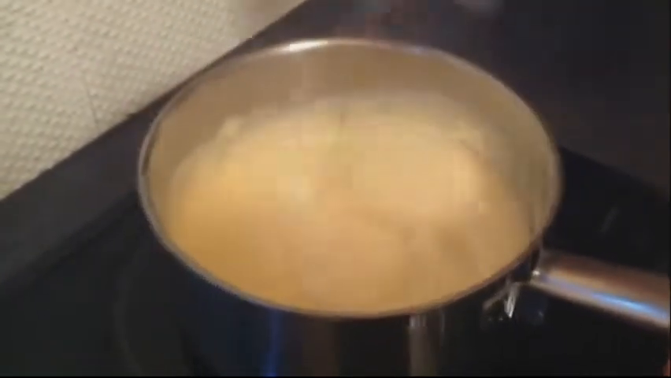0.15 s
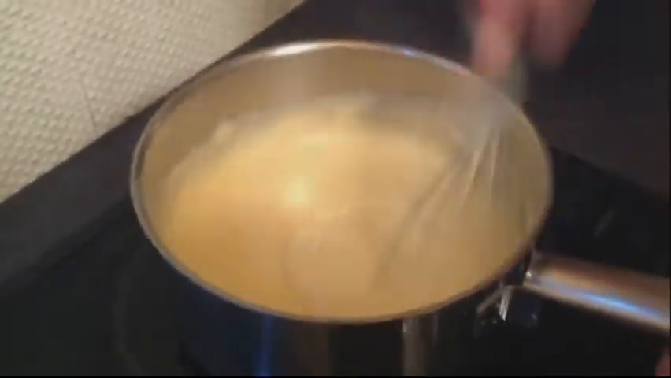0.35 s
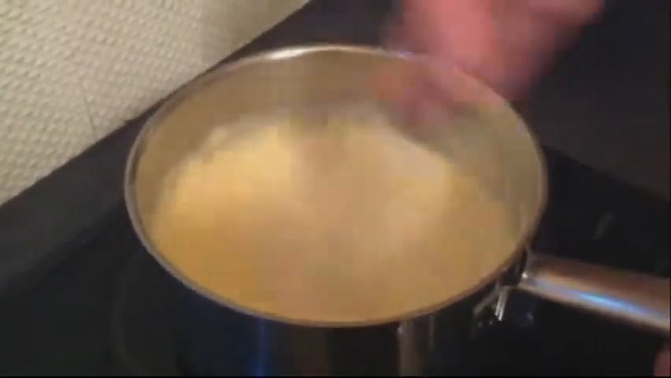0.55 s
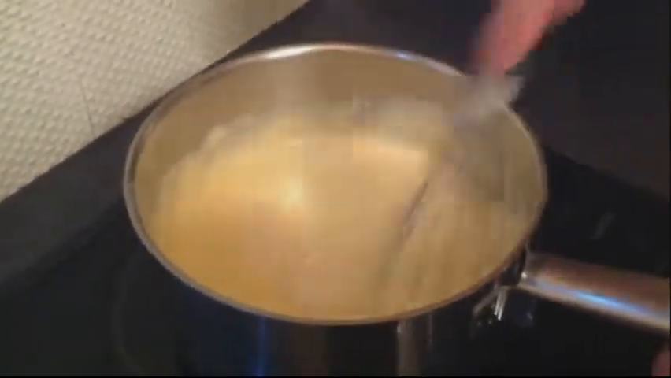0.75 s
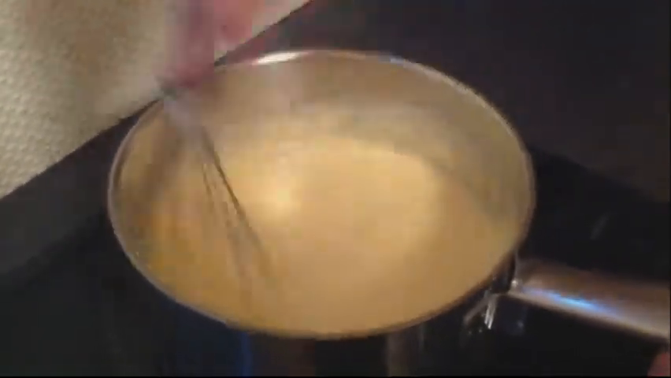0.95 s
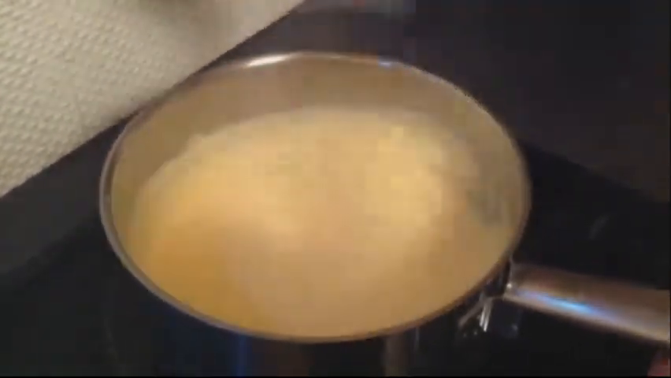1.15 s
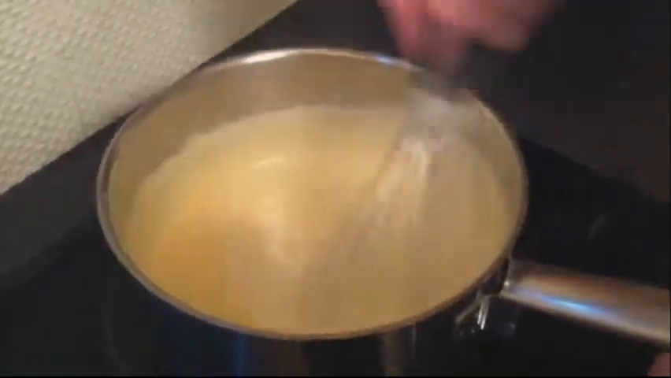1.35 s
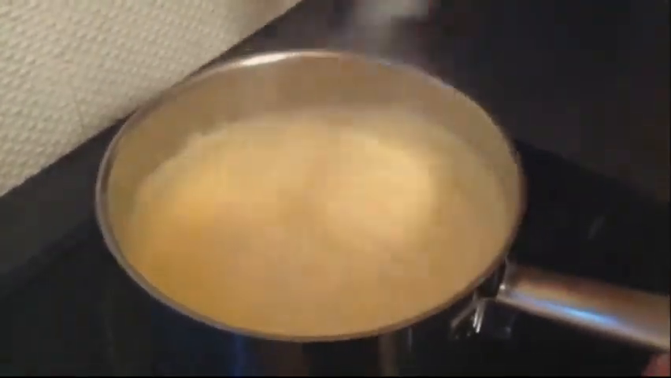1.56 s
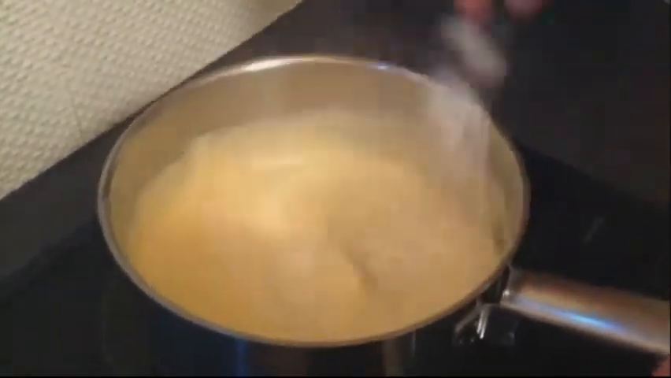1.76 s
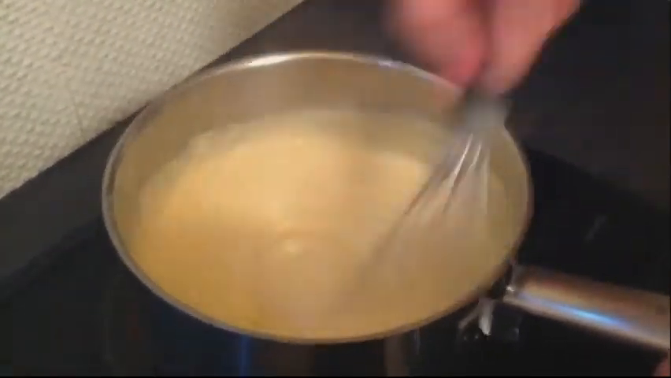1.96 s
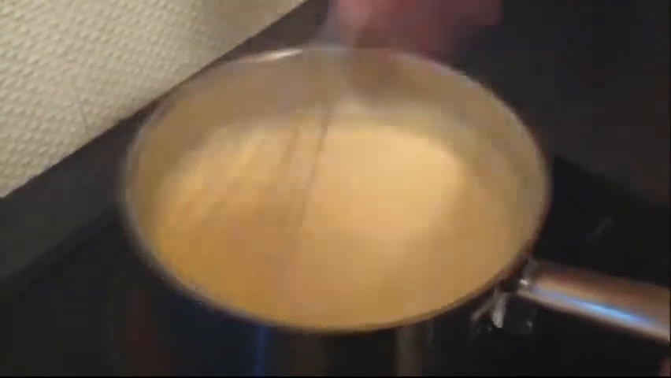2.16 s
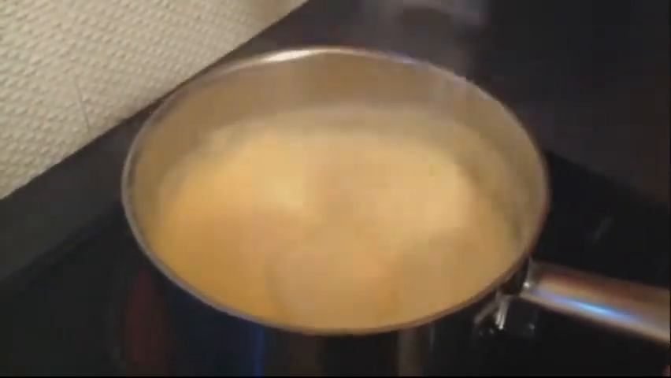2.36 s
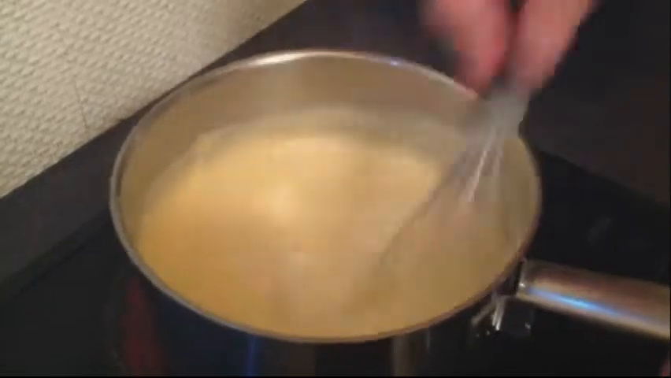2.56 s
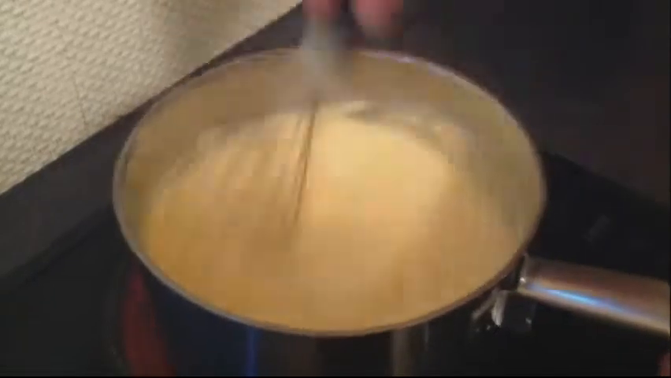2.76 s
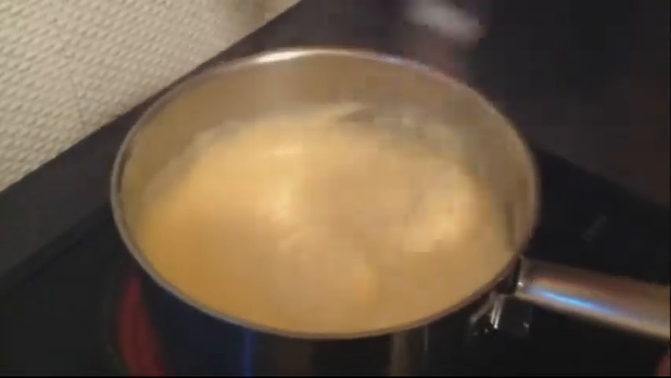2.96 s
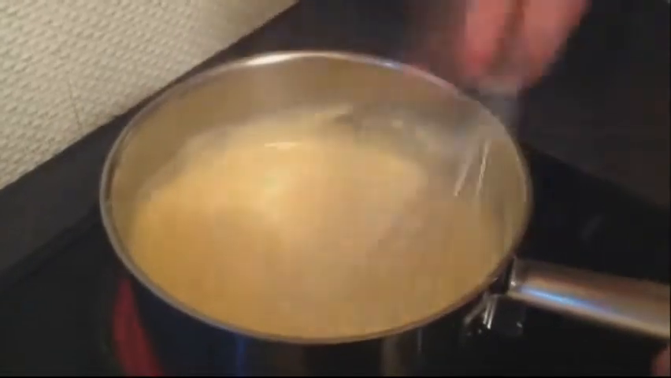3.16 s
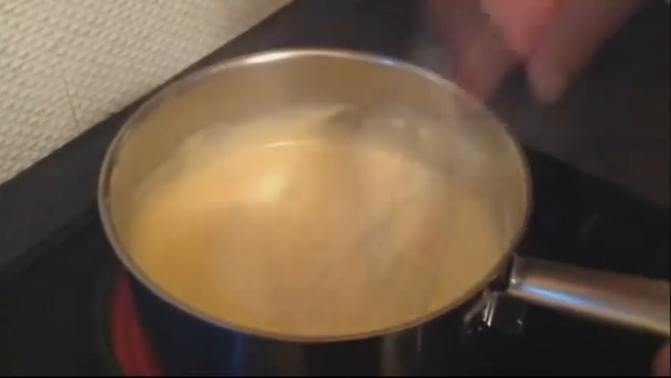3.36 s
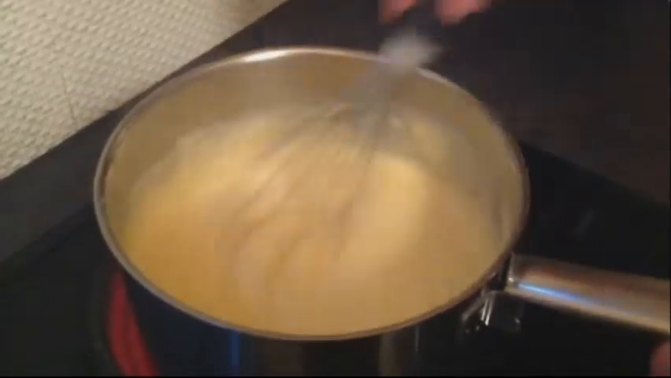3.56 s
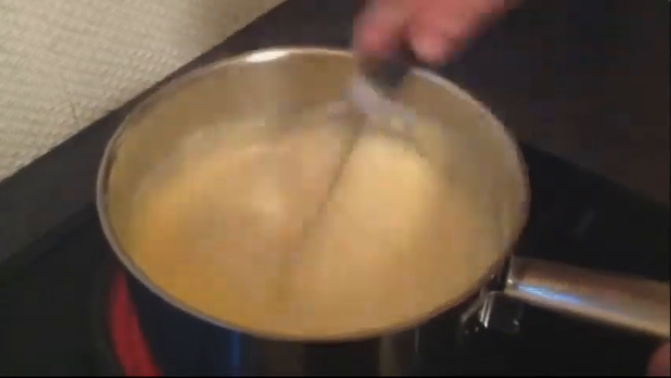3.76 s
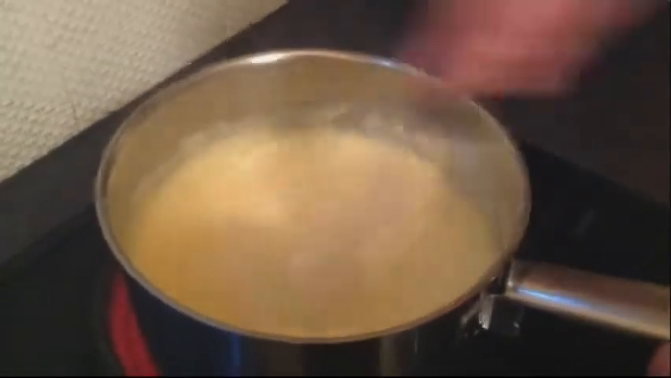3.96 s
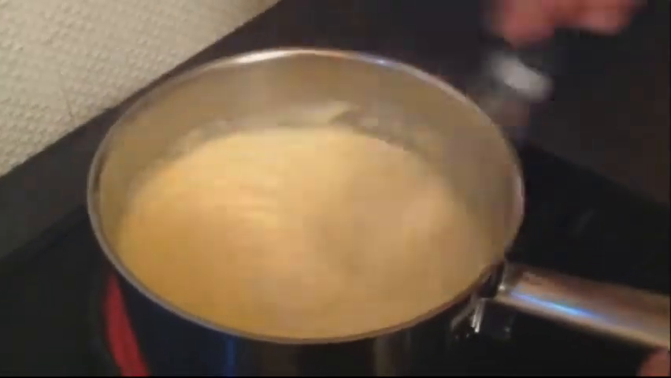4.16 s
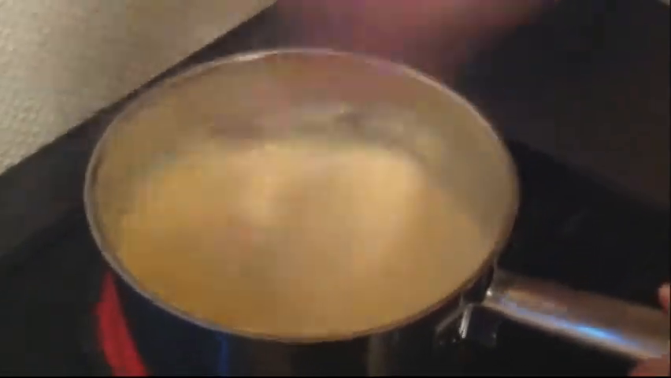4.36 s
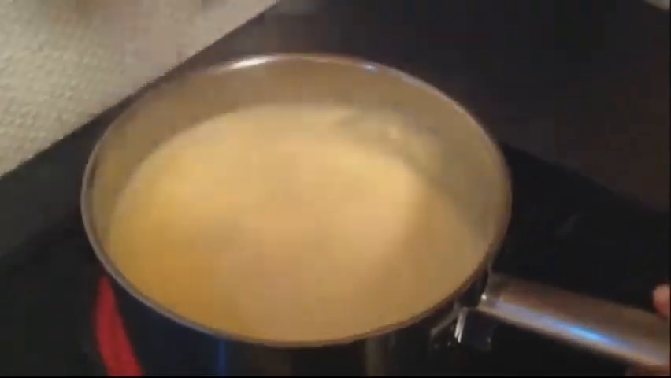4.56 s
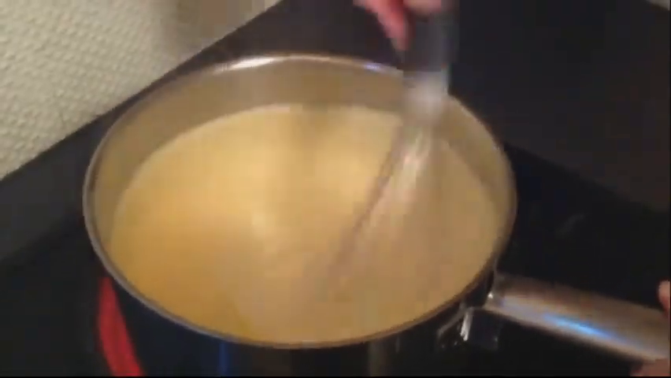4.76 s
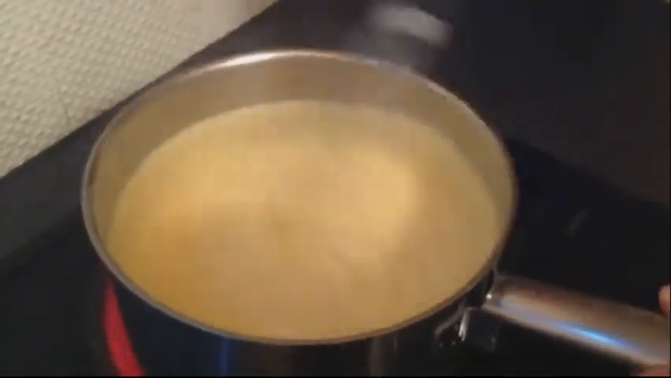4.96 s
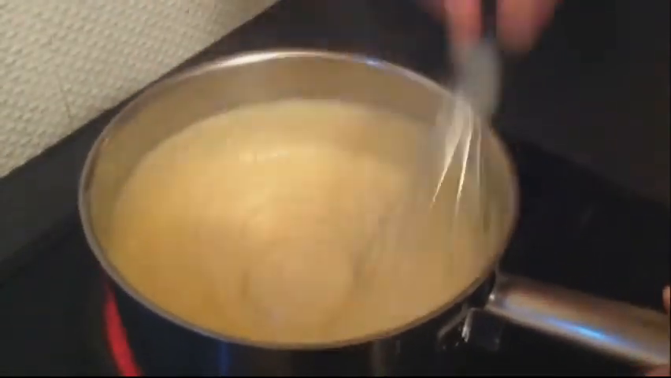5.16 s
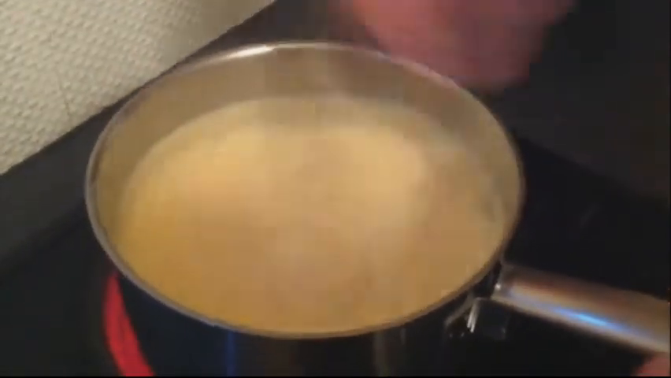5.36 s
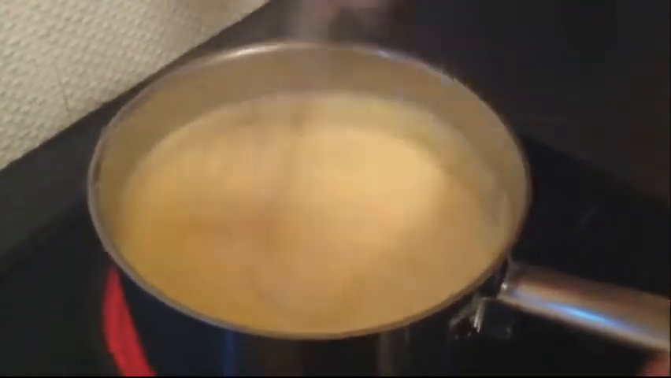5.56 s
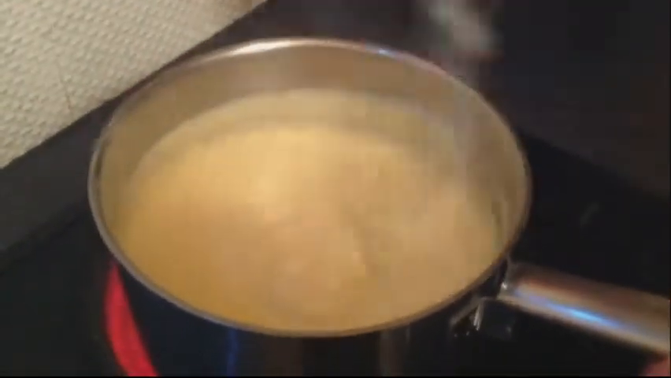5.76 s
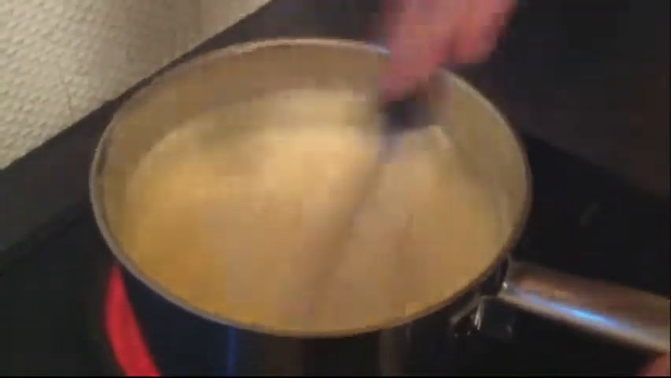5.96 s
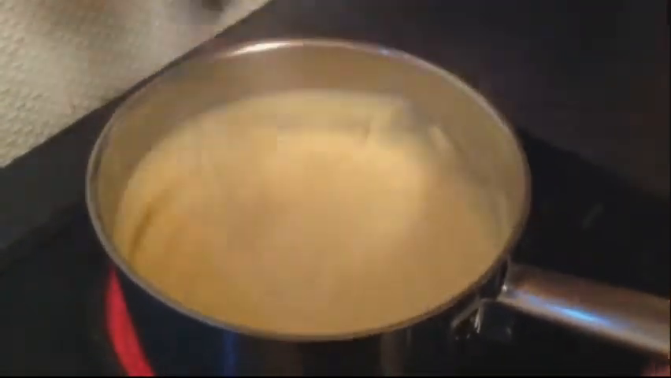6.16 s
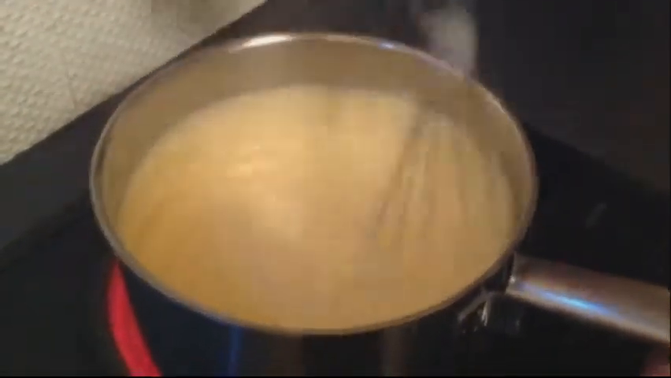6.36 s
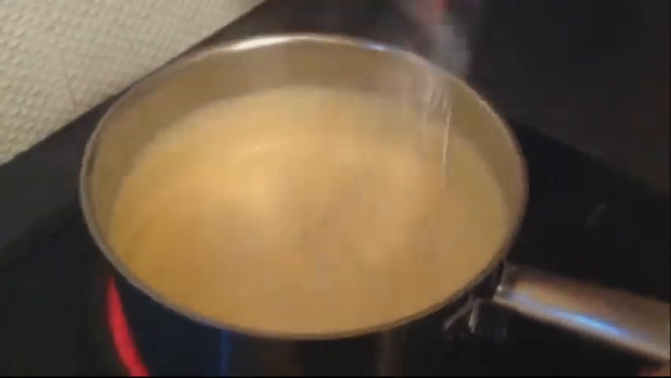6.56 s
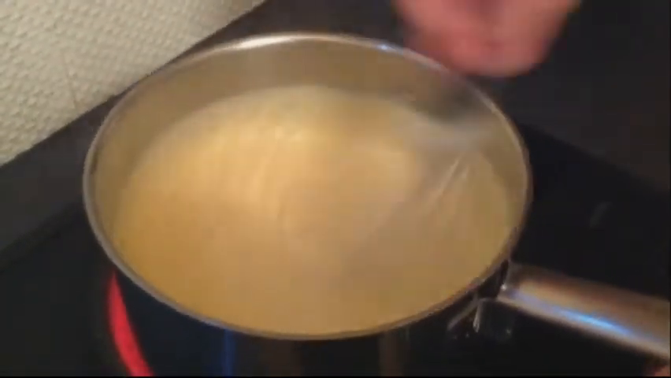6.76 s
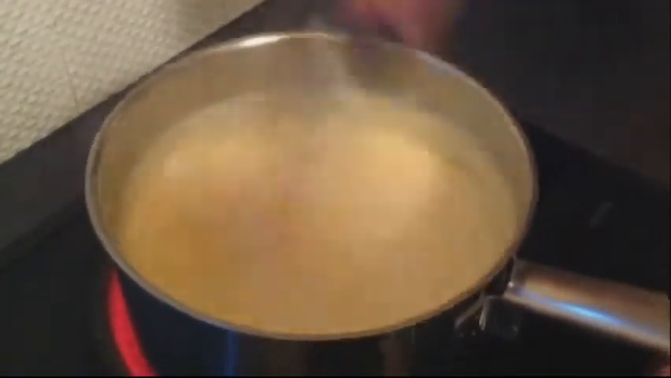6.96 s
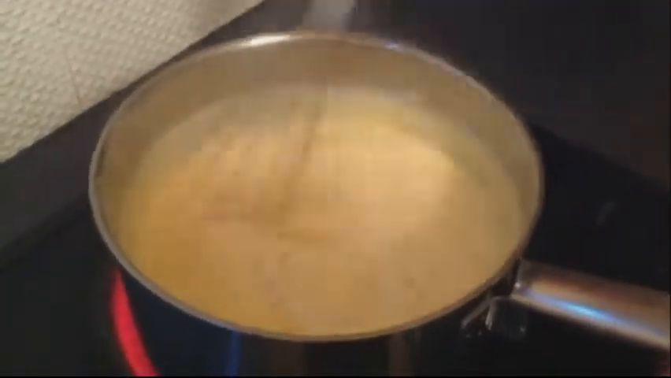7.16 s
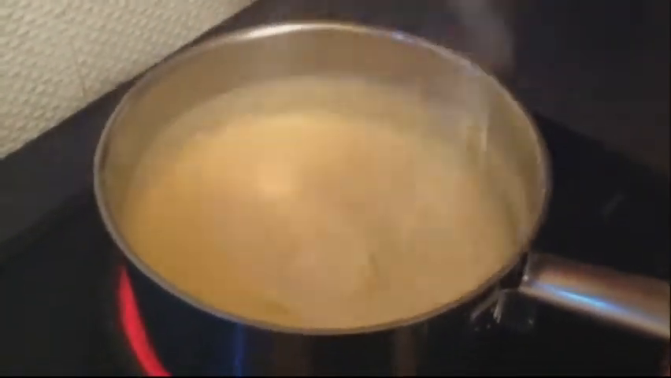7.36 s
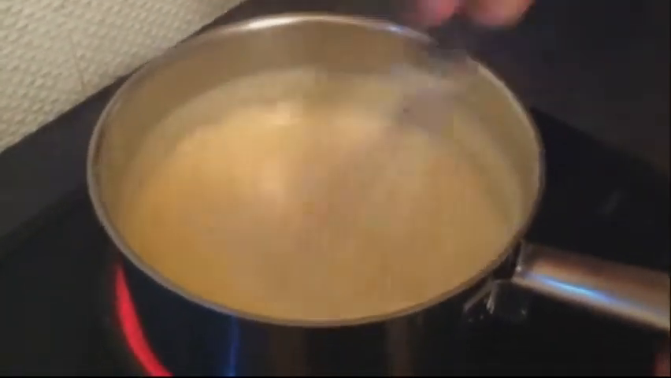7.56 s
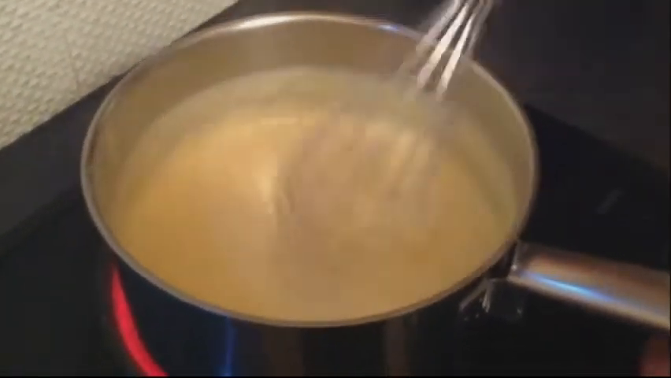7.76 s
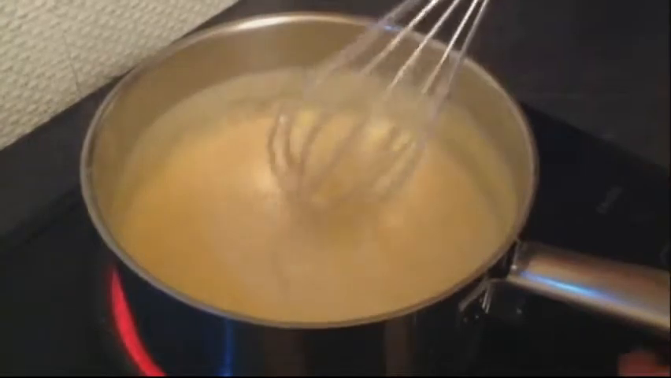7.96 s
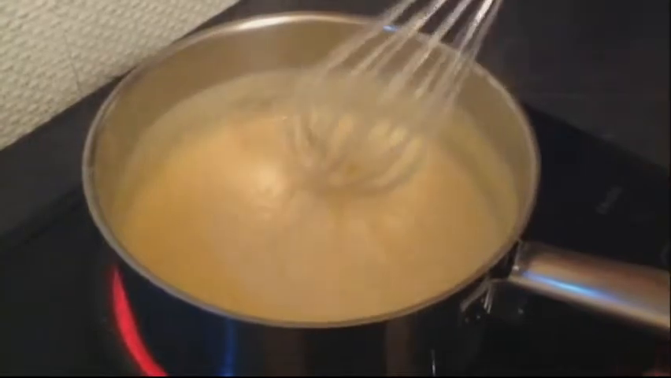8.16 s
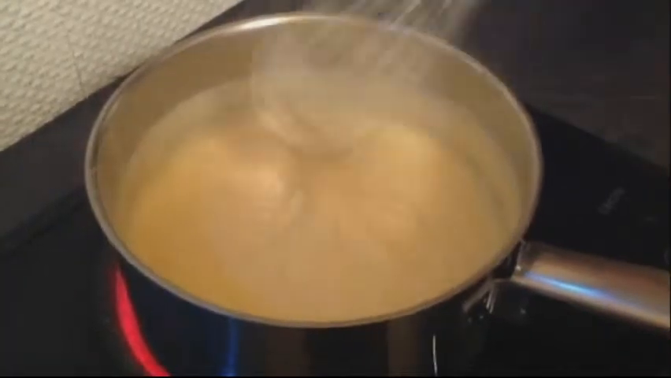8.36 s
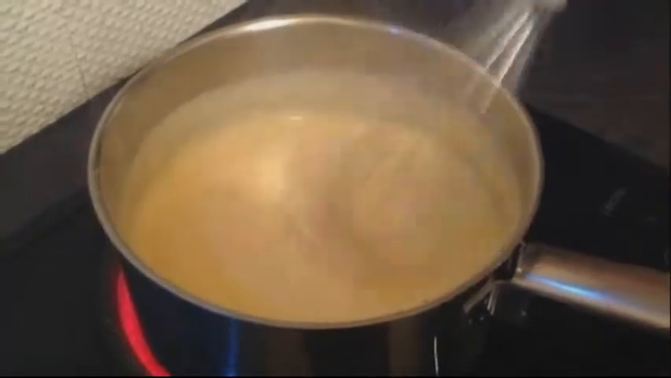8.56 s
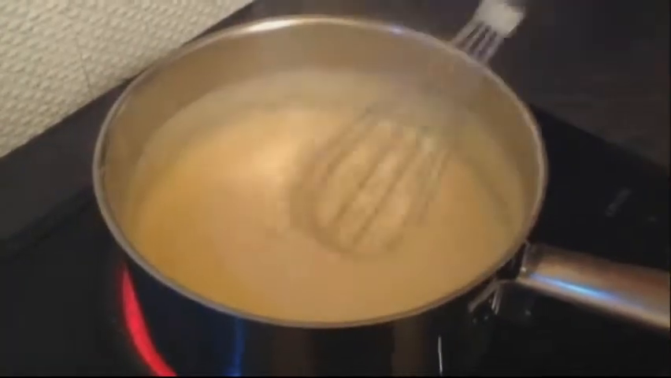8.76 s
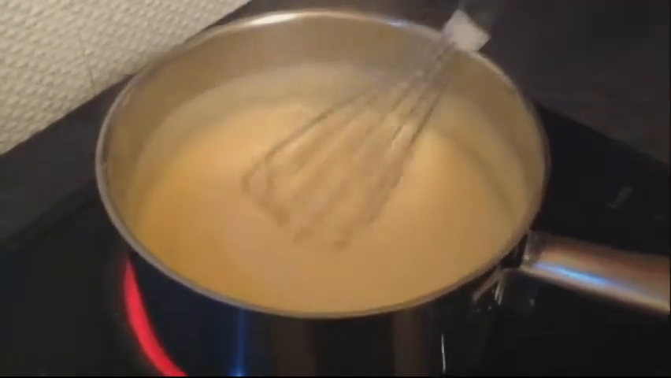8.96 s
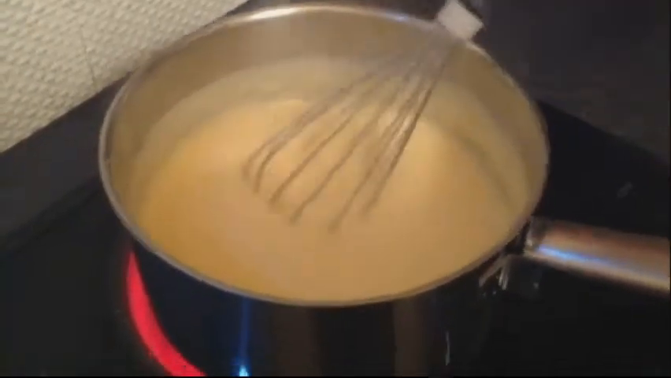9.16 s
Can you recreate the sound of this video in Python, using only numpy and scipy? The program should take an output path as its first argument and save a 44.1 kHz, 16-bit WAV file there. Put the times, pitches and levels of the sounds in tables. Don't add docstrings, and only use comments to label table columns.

```python
import sys
import numpy as np
from scipy import signal
from scipy.fft import rfft, irfft, next_fast_len
from scipy.io import wavfile
from scipy.ndimage import uniform_filter1d, map_coordinates

SR = 44100
rng = np.random.default_rng(int(sys.argv[2]) if len(sys.argv) > 2 else 0)


def volts_from_decibels(level):
    exponent = np.asarray(level, float) / 20
    return 10 ** exponent


def wav_out(sig):
    wavfile.write(sys.argv[1], SR, np.round(np.clip(np.atleast_2d(sig).T, -1, 1) * 32767).astype(np.int16))


N = 406594

# (frequency [Hz], width [Hz], level [dB])
WIRE_MODES = [(2732, 500, -9.5), (3262, 407, -4.5), (3893, 398, -0.5), (4314, 840, 1), (5066, 1380, -0.5),
              (6060, 1055, 1), (6947, 1610, -1), (8153, 1090, -1)]
# (frequency [Hz], width [Hz], level [dB])
TIP_MODES = [(9020, 650, 2.5), (9780, 2820, -3.5), (11170, 505, -2.5), (11610, 566, -4.5),
             (13370, 2700, -1), (14550, 2000, -3.5)]
# (frequency [Hz], width [Hz], level [dB])
LOOP_MODES = [(2090, 55, -7.5), (2810, 76, -6.5), (3252, 140, 3), (3853, 120, 0.5), (4284, 120, -2.5),
              (4507, 86, 3.5), (4920, 43, -4), (5274, 150, 4.5), (5560, 49, -5), (6560, 110, 3.5),
              (7430, 150, -4.5), (7880, 133, 1), (8320, 150, 5.5), (9770, 117, -10.5)]
# (frequency [Hz], width [Hz], level [dB])
RIM_MODES = [(1357, 69, -0.5), (1482, 270, -5), (1815, 78, -4), (2009, 166, -2.5), (2380, 370, -5),
             (2488, 100, -1.5)]
# (frequency [Hz], width [Hz], level [dB])
WALL_MODES = [(616.4, 65, -3), (803, 130, -2.5), (1003, 82, -5), (1227, 195, -8.5)]
# (frequency [Hz], width [Hz], level [dB])
BASE_MODES = [(45.2, 85, -27), (127.3, 12, -0.5), (177.5, 110, -2.5), (293, 36.6, 8), (346, 60, 3.5),
              (466, 170, -3), (584, 36, -2.5)]
# (frequency [Hz], width [Hz], level [dB])
THUD_MODES = [(49.4, 28, -29), (143, 21, 4.5), (188, 28, -3), (283, 8.2, 1), (622, 51, -9.5)]


def unit(x):
    return x / np.sqrt(np.mean(x ** 2) + 1e-20)


def along(points, hz):
    f, v = np.transpose(points)
    return np.interp(np.log(hz + 1), np.log(f + 1), v)


def wobble(rate):
    knots = rng.standard_normal(int(N * rate / SR) + 4)
    return map_coordinates(knots, [np.arange(N) * rate / SR])


def peaked(start, hold, rise, fall):
    t = np.arange(N) / SR
    return -rise * np.maximum(start - t, 0) - fall * np.maximum(t - start - hold, 0)


def filtered(x, response):
    n = x.shape[-1]
    m = next_fast_len(n + 8192)
    return irfft(rfft(x, m) * response(np.fft.rfftfreq(m, 1 / SR)), m)[..., :n]


def ringing(modes, spread_db=0):
    c, w, db = np.transpose(modes)
    gain = volts_from_decibels(db + spread_db) * (-1) ** np.arange(len(c))

    def response(f):
        damping = 1j * f * w[:, None]
        return gain @ (damping / (c[:, None] ** 2 - f * f + damping))
    return response


def blurred(modes, widen):
    return [(c, w * widen, db) for c, w, db in modes]


def gritty(shape, spike_db):
    sizes_db = spike_db * np.minimum(rng.exponential(size=shape), 5)
    return unit(rng.standard_normal(shape) * volts_from_decibels(sizes_db))


def chatter(count, spike_db, bounce_db):
    bounces = np.repeat(rng.standard_normal((count, SR // 4 // 63)), 63, axis=1)
    first = 1 + 0.55 * volts_from_decibels(-60 * np.arange(bounces.shape[1]) / SR / 0.0038)
    return gritty(bounces.shape, spike_db) * volts_from_decibels(bounce_db * np.minimum(bounces, 1.2)) * first


def overlaid(times, sounds):
    at = np.round(times * SR).astype(int)[:, None] + np.arange(sounds.shape[1])
    return np.bincount(at.ravel(), sounds.ravel(), N + SR)[:N]


def struck(times, taps, modes, level_db, t60, rise, hum_db, hum_t60, spread_db=4.0):
    t = np.arange(taps.shape[1]) / SR
    hum = volts_from_decibels(hum_db - 60 * t / hum_t60) * rng.standard_normal(taps.shape)
    push = (taps * volts_from_decibels(-60 * t / t60[:, None]) + hum) * (1 - np.exp(-t / rise))
    strengths_db = spread_db * rng.standard_normal((len(times), len(modes)))
    ring = filtered(push, ringing(modes, strengths_db))
    ring *= volts_from_decibels(level_db)[:, None] / np.abs(ring).max(axis=1, keepdims=True)
    return overlaid(times, ring)


def strokes():
    s, db, top_db, wall_db, base_db, t60 = contacts()
    s = s + 0.0007
    t60 = np.clip(t60, 0.01, 0.3)
    taps = chatter(len(s), spike_db=3.5, bounce_db=2.0)
    wires = struck(s, taps, blurred(WIRE_MODES, 1.16), db - 1.5, t60,
                   rise=0.00042, hum_db=-18.5, hum_t60=0.3, spread_db=2.0)
    tips = struck(s, taps, blurred(TIP_MODES, 1.25), db + top_db + 1.0, 1.2 * t60,
                  rise=0.00045, hum_db=-11, hum_t60=0.15, spread_db=1.5)
    rim = struck(s, taps, RIM_MODES, db + wall_db - 2.0, t60,
                 rise=0.00069, hum_db=-15.5, hum_t60=0.24, spread_db=2.5)
    wall = struck(s, taps, WALL_MODES, db + wall_db - 2.0, 0.73 * t60,
                  rise=0.00076, hum_db=-13.5, hum_t60=0.39, spread_db=2.0)
    deep = struck(s, taps, BASE_MODES[:3], db + base_db + base_drive_db(s) - 3.5, 0.99 * t60,
                  rise=0.0011, hum_db=-18.0, hum_t60=0.31)
    base = struck(s, taps, BASE_MODES[3:], db + base_db - 1.2, 0.98 * t60,
                  rise=0.0018, hum_db=-12.5, hum_t60=0.4)
    loops = struck(s, taps, LOOP_MODES, db - 9.0, 0.56 * t60,
                   rise=0.0005, hum_db=-18, hum_t60=0.16, spread_db=7.5)
    return loops + wires + tips + rim + wall + deep + base


def contacts():
    # (time [s], peak [dB], wall level [dB], chatter t60 [s])
    side_blows = [(.0974, -7, -17, 0.044), (.3785, -9.5, -16.5, 0.036), (.9125, -8, -23.5, 0.023),
                  (1.021, -5.5, -24.5, 0.027), (1.7784, -4.5, -17, 0.056), (2.0291, -8.5, -13, 0.039),
                  (2.389, -14, -22.5, 0.089), (2.9192, -8, -17.5, 0.08), (3.2451, -7, -18, 0.09),
                  (3.972, -12.5, -20.5, 0.13), (4.2518, -15.5, -21, 0.054), (4.4286, -10, -21, 0.028),
                  (4.818, -19.5, -17, 0.34), (4.8527, -19.5, -13.5, 0.11), (5.2758, -13, -23, 0.055),
                  (5.472, -4.5, -18, 0.047), (5.6553, -6, -22.5, 0.029), (6.0158, -2, -21, 0.055),
                  (6.1584, -20.5, -20, 0.12), (6.73, -16, -15.5, 0.028), (6.8627, -5, -18, 0.045),
                  (7.3779, -11, -16, 0.093)]
    # (time [s], peak [dB], wall level [dB], chatter t60 [s])
    bottom_blows = [(.2942, -12, -20, 0.029), (.5738, -9.5, -20, 0.05), (.6615, -10, -15.5, 0.053),
                    (.8731, -13, -12.5, 0.055), (1.5013, -19, -12.5, 0.1), (1.6523, -11.5, -17, 0.021),
                    (1.9254, -9, -16, 0.1), (2.1096, -12.5, -25, 0.069), (2.194, -10.5, -19.5, .055),
                    (2.5212, -5.5, -25.5, 0.026), (2.5938, -9, -17.5, 0.087), (2.8044, -11, -31, 0.015),
                    (2.836, -12.5, -21, 0.092), (3.488, -6, -12, 0.045), (4.0137, -11, -16.5, 0.11),
                    (4.391, -10.5, -16, 0.038), (4.4662, -13, -18, 0.06), (4.9671, -6.5, -5.5, 0.039),
                    (5.0833, -10, -19.5, 0.049), (5.3686, -9.5, -22, 0.016), (5.3887, -17.5, -21, 0.15),
                    (5.7409, -10.5, -16, 0.13), (6.4923, -28.5, -14, 0.16), (6.6282, -22, -10.5, 0.067),
                    (7.0229, -10.5, -20.5, 0.043), (7.1045, -7.5, -15.5, 0.048),
                    (7.2734, -12.5, -32, 0.065)]
    # (time [s], peak [dB], top-wire level [dB])
    side_ticks = [(.1775, -23.5, -17), (.2668, -34, -12), (.8202, -25.5, -14.5), (.8494, -19, -9),
                  (.867, -23, -7), (.9617, -17, -24), (1.262, -23, -16), (1.291, -21.5, -9),
                  (1.3994, -22, -13), (1.5449, -25, -3.5), (1.8277, -19, 1), (2.0334, -8.5, -14.5),
                  (2.3037, -14.5, -12), (2.3178, -15, -12), (2.7526, -52.5, -6.5), (2.7836, -22, 0),
                  (3.1027, -28, 2), (3.4968, -6.5, -17), (4.2822, -20, -2.5), (4.3087, -21, -12),
                  (5.2072, -18, -22.5), (6.122, -18, -7), (6.2506, -23.5, -14), (6.3719, -20.5, -16)]
    # (time [s], peak [dB], top-wire level [dB])
    bottom_ticks = [(.0074, -14.5, -23), (.2695, -13, -12), (.6978, -19, -15), (.995, -27.5, -13.5),
                    (1.3762, -21, -15.5), (1.567, -37.5, -2), (1.6813, -23.5, -12.5), (2.2094, -15.5, -18),
                    (2.2521, -14.5, -20), (2.5586, -27, -6), (3.301, -18.5, -7), (3.7085, -29, -9),
                    (4.3264, -25, -10.5), (4.3615, -22, -13), (4.541, -25, -8), (4.582, -20.5, -2.5),
                    (4.692, -31, 2.5), (4.7233, -18.5, -14), (5.1535, -23, -9), (5.1676, -18, -12),
                    (5.1804, -20.5, -13.5), (6.1814, -30, -25.5), (6.7636, -22.5, -7), (7.584, -41, -8)]
    # (time [s], peak [dB], top-wire level [dB])
    rebounds = [(.205, -36, -7), (.3968, -12, -10), (.974, -28.5, -11), (1.5138, -34, -11),
                (2.6153, -11, -10.5), (2.7307, -30.5, -1), (2.9063, -24, -4), (2.9397, -14.5, -6.5),
                (2.9568, -14.5, -8), (4.063, -17.5, -8.5), (4.3818, -12.5, -10), (4.4795, -13, -7),
                (4.4865, -14.5, -10), (5.1015, -11.5, -7), (5.7571, -19, -3.5), (6.345, -32, -9.5),
                (6.4268, -27, -11), (6.0215, -8, -4), (1.7755, -22, -6.5), (7.374, -20, -3)]
    side_db, bottom_db = -32, -22
    rows = []
    for blows, base_db in ((side_blows, side_db), (bottom_blows, bottom_db)):
        rows += [(s, db, -7.5, wall_db, base_db, t60) for s, db, wall_db, t60 in blows]
    lighter = ((side_ticks, side_db, 0.067), (bottom_ticks, bottom_db, 0.067), (rebounds, side_db, 0.038))
    for ticks, base_db, t60 in lighter:
        for s, db, top_db in ticks:
            wall_db = -40 + 0.44 * (db + 23.5) - db
            rows.append((s, db, top_db, wall_db, base_db, t60))
    return np.transpose(rows)


def base_drive_db(s):
    # (time [s], level [dB])
    bearing = [(0, 2), (.7, -1.5), (1.2, -5.5), (1.7, 6.5), (2.3, -2), (2.9, 2), (3.4, -1), (4.1, 1),
               (4.7, -3), (5.2, 1.5), (5.7, -2.5), (6.25, -13), (6.7, 6.5), (7.3, -3.5), (7.7, 3.5)]
    return np.interp(s, *np.transpose(bearing))


def snaps(rows):
    s, db = np.transpose(rows)
    taps = 0.13 * rng.standard_normal((len(s), SR // 50))
    taps[:, :3] = [1, 2, 1]
    modes = blurred(WIRE_MODES[1:] + TIP_MODES[:4], 1.17)
    return struck(s, taps, modes, db - 0.7, np.full(len(s), 0.0038),
                  rise=0.00002, hum_db=-23.5, hum_t60=0.03, spread_db=4.0)


def thumps():
    # (time [s], peak [dB])
    thump_events = [(0.364, -34.5), (0.578, -22), (0.667, -26.5), (0.883, -35.5), (1.021, -31),
                    (1.381, -34), (1.548, -38), (1.653, -28), (1.776, -33), (1.928, -29), (2.032, -32),
                    (2.114, -36), (2.172, -36), (2.255, -31), (2.525, -27), (2.603, -43), (2.805, -31),
                    (2.843, -25.5), (2.906, -34), (3.247, -44), (3.489, -25), (4.028, -27), (4.253, -45),
                    (4.395, -32.5), (4.488, -29), (4.709, -43), (4.967, -18), (5.173, -35), (5.371, -36),
                    (5.472, -32), (5.659, -31.5), (5.769, -35.5), (6.732, -33), (6.87, -39.5), (7.032, -34),
                    (7.104, -42)]
    s, db = np.transpose(thump_events)
    taps = chatter(len(s), spike_db=1.0, bounce_db=1.0)
    return struck(s, taps, BASE_MODES[2:], db - 3.5, np.full(len(s), 0.055),
                  rise=0.0018, hum_db=-17.0, hum_t60=0.35)


def rings():
    # (time [s], frequency [Hz],
    # peak [dB])
    sung_notes = [(0.0974, 725, -34.5), (0.574, 778, -35), (0.66, 590, -36), (0.66, 2110, -30),
                  (0.9125, 2000, -30), (1.021, 969, -34), (1.778, 592, -32), (1.778, 2560, -26.5),
                  (1.925, 608, -35), (1.925, 2659, -29), (2.03, 712, -31.5), (2.194, 636, -32),
                  (2.52, 330, -31), (2.52, 610, -33), (2.594, 704, -33.5), (2.92, 634, -34),
                  (3.245, 670, -42), (3.488, 650, -35), (3.488, 795, -36), (4.014, 279, -36),
                  (4.391, 291, -34), (5.083, 617, -36), (5.275, 2640, -27), (5.275, 3880, -38),
                  (5.472, 729, -29.5), (5.741, 577, -33.5), (6.016, 2850, -21), (6.016, 823, -30.5),
                  (6.016, 358, -41.5), (6.016, 1303, -32), (6.628, 1955, -36.5), (6.863, 2460, -31.5),
                  (6.863, 750, -36), (7.105, 760, -30.5), (7.105, 1518, -30.5), (7.105, 289, -35.5),
                  (7.274, 640, -40.5), (7.378, 738, -35.5),
                  (4.968, 118, -34), (4.82, 110, -48), (4.968, 2010, -20.5), (1.4, 2000, -35.5),
                   (1.401, 1540, -41), (1.4, 2820, -35.5), (1.378, 310, -37.5), (1.548, 268, -37.5),
                   (8.856, 1150, -54), (8.856, 300, -54), (6.16, 345, -43), (6.42, 813, -49),
                   (5.657, 430, -36), (5.2, 560, -40.5), (9.045, 1100, -46), (9.06, 1170, -46),
                   (7.981, 2500, -58), (3.25, 1000, -41)]
    s, hz, db = np.transpose(sung_notes)[:, :, None]
    t = np.arange(SR // 4) / SR
    drift = 0.012 * np.cumsum(rng.standard_normal((len(s), len(t))), axis=1)
    t60 = 0.098 * (600 / hz) ** 0.44
    envelope = volts_from_decibels(db + 4.5 - 60 * t / t60) * (1 - np.exp(-t / 0.0013))
    return overlaid(s[:, 0] + 0.001, envelope * np.sin(2 * np.pi * hz * t + drift))


def clunk():
    # (frequency [Hz], width [Hz], level [dB])
    clunk_modes = [(171, 36, 8), (396, 79, 5.5), (510, 85, 5), (655, 42, 2.5), (935, 180, -6.5),
                   (1270, 120, 4), (1495, 130, -9), (1728, 100, -4.5), (1830, 43, -2.5), (1986, 60, 9.5),
                   (2330, 410, -5.5)]
    # (time [s], peak [dB], t60 [s])
    clunk_event = (4.9675, -6.5, 0.035)
    s, db, t60 = np.array(clunk_event)[:, None]
    taps = chatter(1, spike_db=3.5, bounce_db=-1.0)
    return struck(s, taps, clunk_modes, db, t60, rise=0.0011, hum_db=-12, hum_t60=0.27, spread_db=-1.0)


def drag():
    press, body = sweeps()
    grip_db = 1.3 * wobble(25) + 1.4 * wobble(90) + 0.9 * wobble(400)
    slip = patchy(gritty(N, 3.2) * volts_from_decibels(grip_db), 2.3)
    sliding_wires = ringing(blurred(WIRE_MODES, 1.36))
    sliding_tips = ringing(blurred(TIP_MODES, 1.36))

    def thin_wires(hz):
        return sliding_wires(hz) * (1j * hz / (1j * hz + 2380)) ** 3
    wires = press * volts_from_decibels(1.1 + 0.8 * wobble(40)) * unit(filtered(slip, thin_wires))
    tips = press * volts_from_decibels(1.5 + 1.3 * wobble(45)) * unit(filtered(slip, sliding_tips))
    wall_sound = unit(filtered(patchy(slip, 2.6), ringing(WALL_MODES + RIM_MODES)))
    wall = body * volts_from_decibels(-2.5 + 0.94 * wobble(12)) * wall_sound
    deep_db = base_drive_db(np.arange(N) / SR) - 8.0 + 3.5 * wobble(12)
    deep = body * volts_from_decibels(deep_db) * unit(filtered(gritty(N, 3.8), ringing(BASE_MODES[:3])))
    base_sound = unit(filtered(patchy(gritty(N, 2.5), 3.2), ringing(BASE_MODES[3:])))
    base = body * volts_from_decibels(-5.5 + 1.9 * wobble(17)) * base_sound
    squeal_db = -12.5 + peaked(start=7.58, hold=0.057, rise=300, fall=150)
    squeal = press * volts_from_decibels(squeal_db) * unit(filtered(slip, ringing(LOOP_MODES[2:6])))
    return wires + tips + wall + deep + base + squeal


def sweeps():
    # (start [s], hold [s], wire level [dB], pan body level [dB])
    sweep_events = [(0, 0.0035, -31.5, -2.5), (0.126, 0.29, -38, -6), (0.63, 0.088, -37, -10),
                    (1.096, 0.14, -36, -13), (1.326, 0.09, -42.5, -5.5), (1.552, 0.042, -41, -12),
                    (1.672, 0.2, -37.5, -11.5), (2.025, 0.39, -35.5, -9.5), (2.308, 0.013, -32.5, -6.5),
                    (2.6, 0.15, -35.5, -11.5), (2.925, 0.0077, -38, -4), (3.097, 0.024, -42.5, -9),
                    (3.266, 0.041, -36.5, -10.5), (3.502, 0.087, -39.5, -7), (3.76, 0.13, -40, -9.5),
                    (4.06, 0.028, -36.5, -7.5), (4.31, 0.013, -39.5, -6.5), (4.567, 0.11, -34, -26),
                    (4.72, 0.14, -40, -7.5), (5.182, 0.059, -33.5, -10), (5.347, 0.1, -37.5, -10.5),
                    (5.739, 0.038, -37, -7.5), (6.187, 0.15, -38.5, -13.5), (6.402, 0.069, -42.5, -11),
                    (6.676, 0.028, -49, -3.5), (6.837, 0.062, -42, -8.5), (7.093, 0.018, -37, -8.5),
                    (7.316, 0.071, -40.5, -5.5), (7.476, 0.069, -46.5, -8), (7.58, 0.026, -45, -11)]
    # (time [s], length [s])
    hop_events = [
        (0.779, 0.072),
        (1.454, 0.062),
        (1.619, 0.027),
        (4.365, 0.013),
        (4.914, 0.074),
        (6.564, 0.063),
    ]
    lift_rate = 377
    swells = np.array([volts_from_decibels(db + peaked(s, abs(hold), rise=72.5, fall=111)) for s, hold, db, _ in sweep_events])
    touch_db = lift() + peaked(0, 7.68, 0, lift_rate)
    for s, length in hop_events:
        leaving = peaked(0, s, 0, lift_rate)
        landing = peaked(s + length, 99, 3000, 0)
        touch_db = touch_db + np.maximum(leaving, landing)
    touch = volts_from_decibels(touch_db)
    body_gain = volts_from_decibels(np.transpose(sweep_events)[3])[:, None]
    return touch * swells.max(axis=0), touch * (swells * body_gain).max(axis=0)


def lift():
    s, db = contacts()[:2]
    blows = np.bincount(np.round(s * SR).astype(int), volts_from_decibels(0.5 * db), N)
    before = volts_from_decibels(-60 * np.arange(SR // 8) / SR / 0.047)
    return -3.5 * signal.fftconvolve(blows[::-1], before)[:N][::-1]


def patchy(x, contrast_db):
    z = signal.stft(x, nperseg=512)[2]
    field = uniform_filter1d(rng.standard_normal(z.shape), 7, 0)
    field = uniform_filter1d(field, 9, 1)
    return signal.istft(z * volts_from_decibels(contrast_db * unit(field)), nperseg=512)[1][:N]


def scuff():
    # (frequency [Hz], density [dB per Hz])
    grit_colour = [(240, -61), (400, -42), (616, 2), (781, -19), (893, -3), (1350, -9.5), (2570, -5),
                   (14000, -27)]
    start, rise, fall = 8.232, 830.5, 121
    grit = unit(filtered(gritty(N, 3.6), lambda hz: volts_from_decibels(along(grit_colour, hz))))
    slide_db = peaked(start, 0, rise, fall) + peaked(0, 8.33, 0, fall)
    slide = volts_from_decibels(-44.5 + slide_db + 0.5 + 1.7 * wobble(55)) * grit
    hob_db = -58.5 + peaked(start, 0.12, rise, 35)
    hob = volts_from_decibels(hob_db) * unit(filtered(gritty(N, 1), ringing(THUD_MODES[2:4])))
    return slide + hob


def knocks():
    # (time [s], peak [dB], ring level [dB], thud level [dB], click t60 [s])
    knock_events = [
        (7.981, -44, -27, -7, 0.059),
        (8.1883, -61, -10, 18, 0.033),
        (8.6388, -49.5, -11, -13, 0.027),
        (8.8607, -38.5, -12, -4, 0.059),
        (9.0292, -24.5, -11.5, -5, 0.034),
    ]
    # (frequency [Hz], width [Hz], level [dB])
    board_modes = [(840, 94, -6.5), (1027, 50, -2), (1150, 44, 4), (1270, 49, -6), (1790, 66, -16)]
    s, db, ring_db, thud_db, t60 = np.transpose(knock_events)
    taps = chatter(len(s), spike_db=2.5, bounce_db=6.5)
    click = struck(s, taps, WIRE_MODES + TIP_MODES + RIM_MODES, db + 2.7, t60,
                   rise=0.00028, hum_db=-10.5, hum_t60=0.21, spread_db=2.5)
    board = struck(s, taps, board_modes, db + ring_db + 0.5, 1.14 * t60,
                   rise=0.0012, hum_db=6.0, hum_t60=0.32, spread_db=3.5)
    thud = struck(s, taps, THUD_MODES, db + thud_db - 3.5, 1.3 * t60,
                  rise=0.00062, hum_db=-10.0, hum_t60=0.41)
    return click + board + thud


def kitchen(x):
    # (frequency [Hz], t60 [s])
    room_decay = [(150, 0.52), (700, 0.69), (3000, 0.51), (12000, 0.087)]
    wet, step = np.zeros(N + SR), SR // 4
    for start in range(0, N, step):
        hz, t, z = signal.stft(rng.standard_normal(SR // 3), SR, nperseg=256)
        decay = volts_from_decibels(-60 * t / along(room_decay, hz)[:, None])
        tail = signal.istft(z * decay, SR, nperseg=256)[1]
        echo = signal.fftconvolve(x[start:start + step], tail / np.linalg.norm(tail))
        wet[start + 200:][:len(echo)] += echo
    return wet[:N]


def hush():
    # (frequency [Hz], density [dB per Hz])
    hush_colour = [(20, -36.5), (75, -26), (100, -8.5), (126, -15.5), (190, -3.5), (300, -5), (420, -9),
                   (700, -12.5), (2500, -16.5), (12500, -27), (15500, -29.5)]
    air = filtered(rng.standard_normal(N), lambda hz: volts_from_decibels(along(hush_colour, hz)))
    hum_rise_db = np.maximum(peaked(start=7.5, hold=9, rise=40, fall=0), -7.5)
    phase = 2 * np.pi * 100.5 * np.arange(N) / SR + 0.79 * wobble(4.3)
    hum = volts_from_decibels(-65.0 + hum_rise_db + 0.43 * wobble(2.9)) * np.sin(phase)
    return volts_from_decibels(-58.5 + 0.91 * wobble(5.6)) * unit(air) + hum


def scene():
    # (time [s], peak [dB])
    snap_events = [(.0081, -17.5), (.0987, -9), (.1785, -16.5), (.3796, -7), (.3975, -22), (.5751, -10),
                   (.699, -13.5), (.9147, -9), (.9748, -28), (1.6536, -8), (1.6827, -14.5), (1.7794, -5.5),
                   (1.7816, -14.5), (1.8291, -10.5), (1.9271, -3), (2.03, -14), (2.0345, -10),
                   (2.038, -10.5), (2.1967, -2), (2.2094, -13.5), (2.3189, -6.5), (2.5956, -4.5),
                   (2.7314, -27), (2.9208, -7), (2.9404, -14), (3.2474, -6.5), (3.489, -3), (3.4908, -5.5),
                   (3.4981, -22), (4.253, -14.5), (4.3295, -23), (4.3825, -13.5), (4.3927, -4),
                   (4.4296, -10.5), (5.0848, -15.5), (5.1022, -20), (5.2077, -14), (5.3701, -8.5),
                   (5.474, -7.5), (5.6559, -8), (5.7426, -4), (5.7578, -23), (6.1597, -7), (6.3728, -20.5),
                   (6.7312, -9.5), (6.8648, -8.5), (7.0245, -9), (7.1068, 0), (7.2735, -14), (2.525, -11),
                   (2.527, -11.5), (5.476, -5.5), (5.658, -12.5), (6.0208, -4), (6.0215, -2.5), (6.026, -8),
                   (6.8675, -8.5), (0.58, -11.5), (1.0225, -8)]
    # (time [s], peak [dB])
    more_snap_events = [(0.0574, -25), (0.1119, -18), (0.1219, -19), (0.2059, -30), (0.2607, -22.5),
                        (0.2684, -26), (0.2972, -15), (0.8673, -20.5), (1.4013, -25.5), (1.5466, -24),
                        (1.5859, -27), (2.0298, -11.5), (2.4329, -21.5), (2.7314, -20), (2.8035, -13.5),
                        (2.9206, -5.5), (3.3324, -28), (3.4981, -6), (4.2919, -22), (4.8548, -19),
                        (4.9305, -35), (5.1796, -17), (5.3906, -15.5), (5.7576, -18), (5.9448, -38.5),
                        (5.9775, -35.5), (6.2524, -23), (6.4924, -26), (6.573, -38), (6.7659, -24),
                        (9.2188, -50)]
    hits = strokes() + snaps(snap_events) + snaps(more_snap_events) + thumps() + rings() + clunk() + knocks()
    rub = drag() + scuff()
    room = kitchen(volts_from_decibels(-17) * hits + volts_from_decibels(-12.0) * rub)
    return (hits + rub + room + hush())[None]


def top_cut(x):
    return signal.sosfilt(signal.butter(12, 16480, fs=SR, output="sos"), x)


def record(dry):
    rounded = dry / (1 + np.abs(dry / 0.9) ** 4) ** (1 / 4)
    top = volts_from_decibels(-36)
    heard = filtered(rounded, lambda hz: 1j * hz / (1j * hz + 30) * np.where(hz < 15350, 1, top))
    return top_cut(heard)


dry = scene()
out = record(dry)
wav_out(out)
```